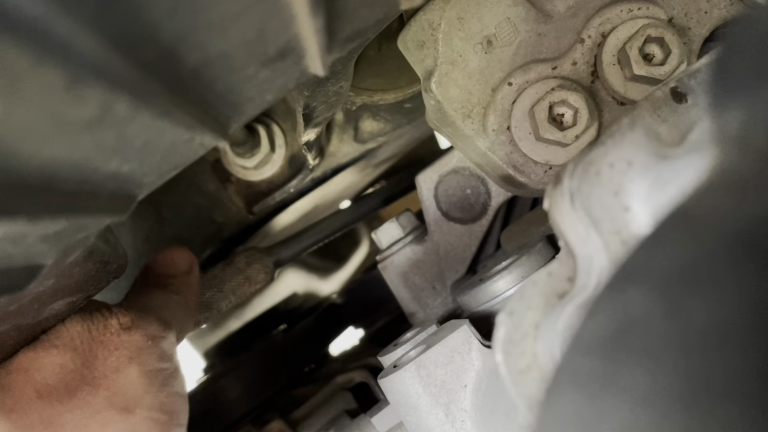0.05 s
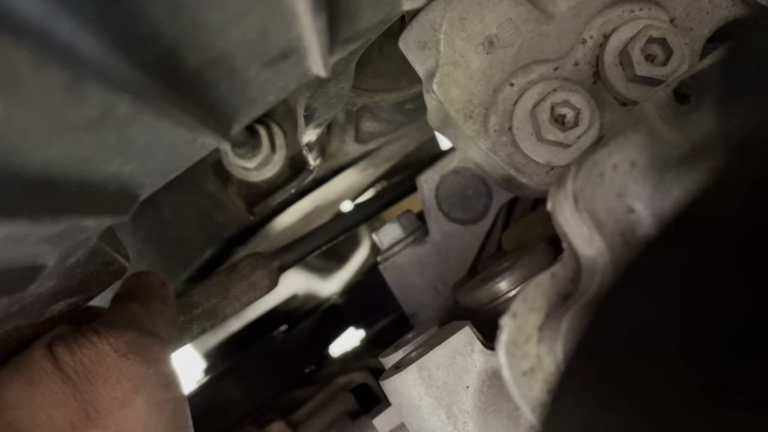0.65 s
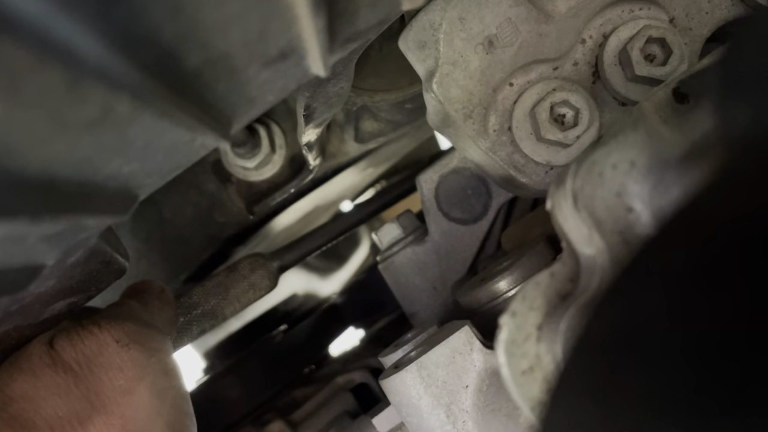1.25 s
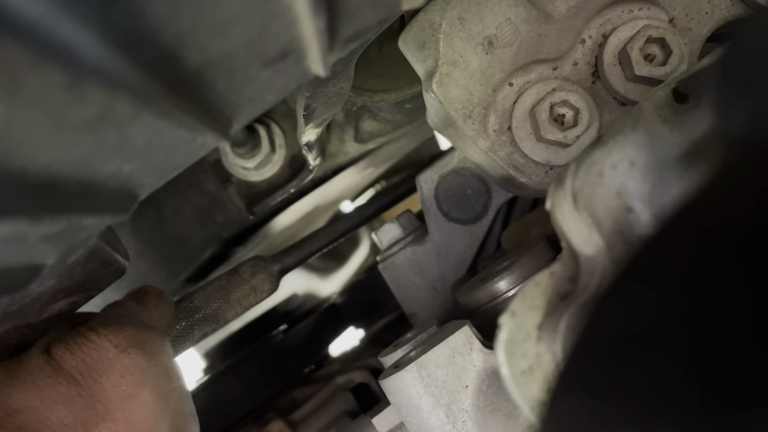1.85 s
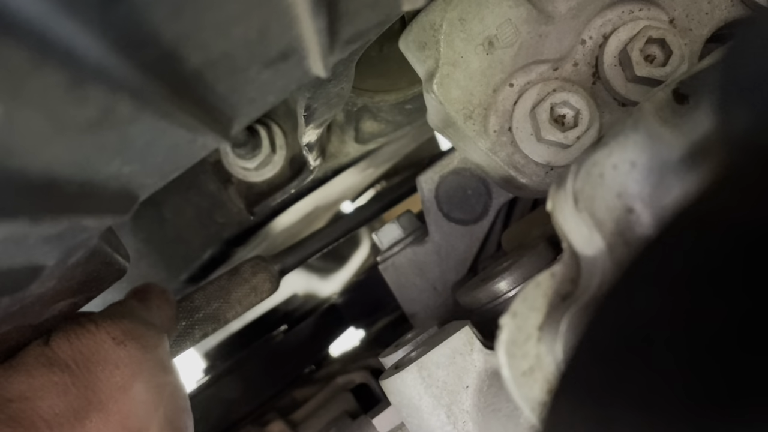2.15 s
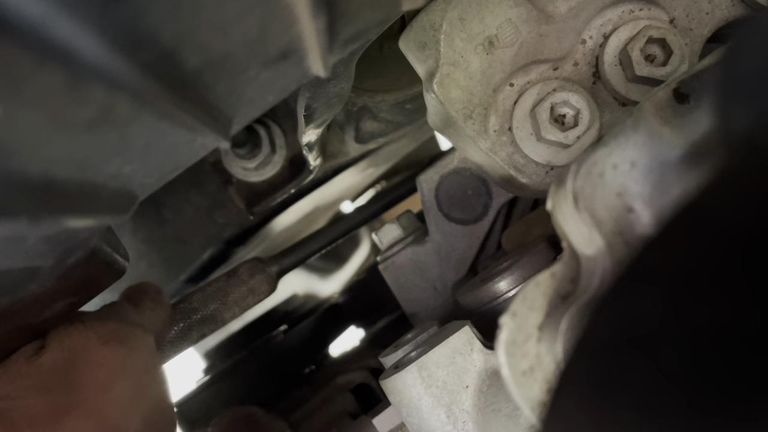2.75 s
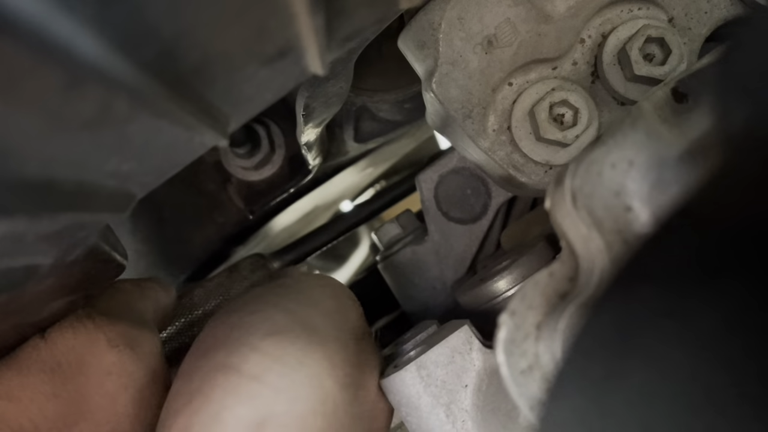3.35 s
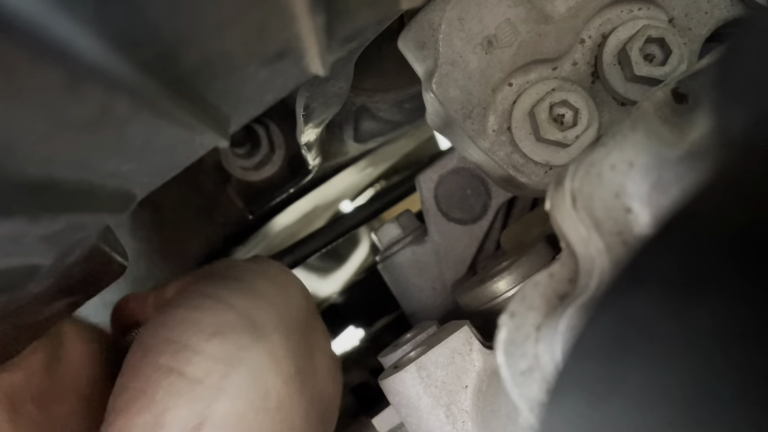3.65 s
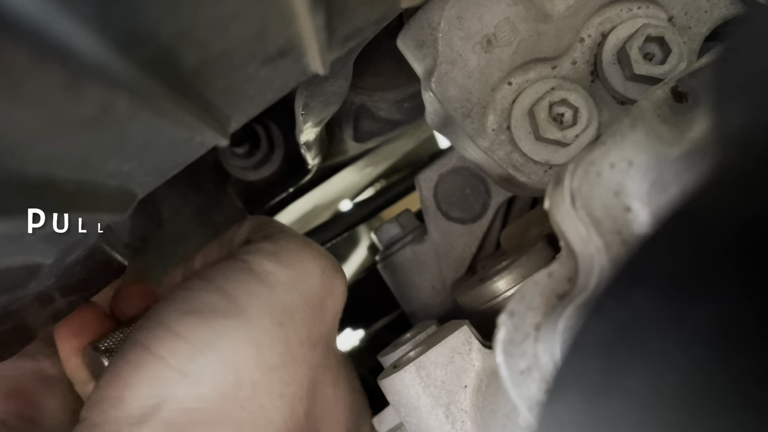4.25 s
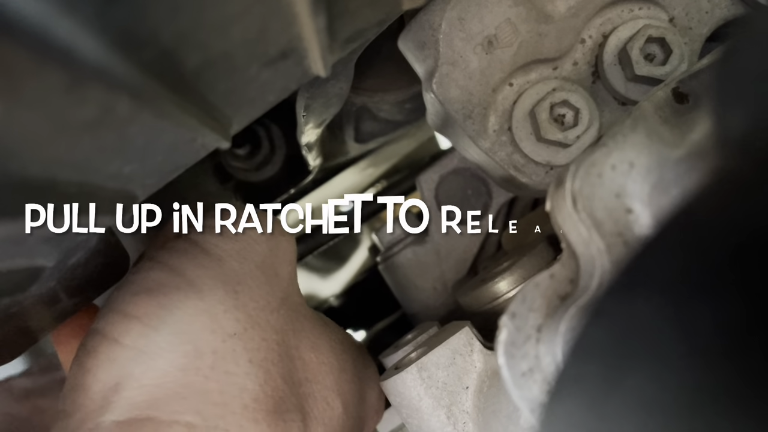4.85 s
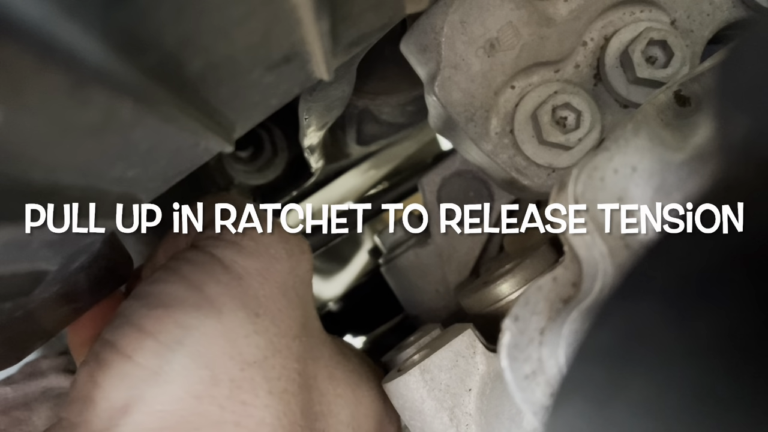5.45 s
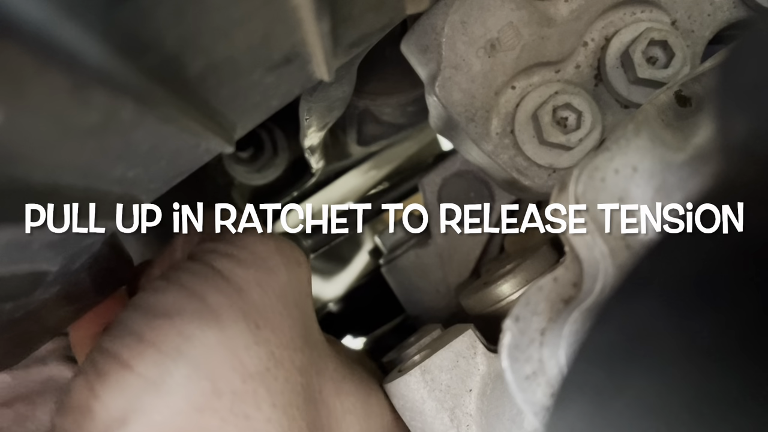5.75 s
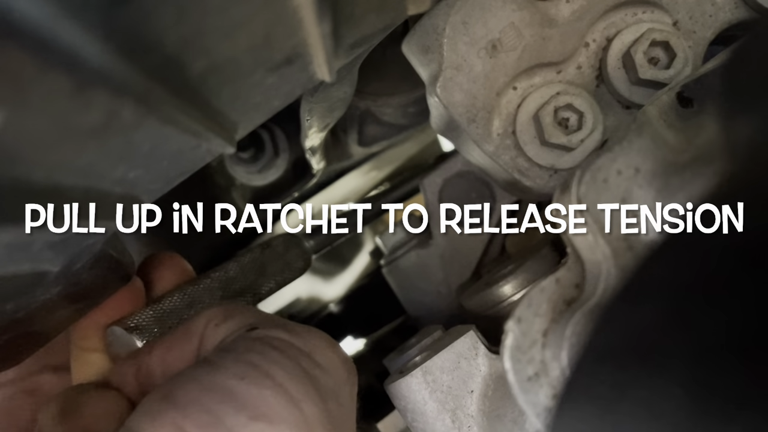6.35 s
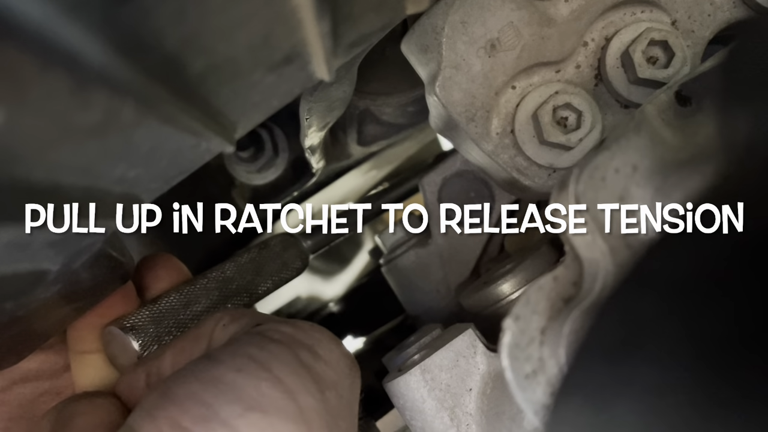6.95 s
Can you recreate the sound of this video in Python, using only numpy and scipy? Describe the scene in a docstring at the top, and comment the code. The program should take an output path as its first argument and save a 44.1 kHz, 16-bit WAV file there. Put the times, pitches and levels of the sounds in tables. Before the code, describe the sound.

Close, faint metal scraping and ticking as a ratchet is worked onto an engine part, with distant traffic rumbling outside.

```python
"""In a car's wheel well, a ratchet on a long extension is worked onto a belt tensioner, close by.
Hands hiss along the tool; steel scrapes, grazes and knocks against the engine, ringing the extension,
a housing and a bracket. The socket clicks home once, and later the tool gives one short squeak.
Traffic rumbles outside: one engine pulls past and changes gear, and another car's tyres draw near."""
import sys
import numpy as np
from scipy import signal
from scipy.fft import rfft, irfft
from scipy.io import wavfile
from scipy.ndimage import uniform_filter1d

SR = 44100
rng = np.random.default_rng(int(sys.argv[2]) if len(sys.argv) > 2 else 0)


def log_audio(samples):
    """Write samples as a 16-bit WAV file to the path given in sys.argv[1]."""
    # one column per channel
    frames = np.atleast_2d(samples).T
    # limit to full scale, then quantise
    limited = np.clip(frames, -1, 1)
    pcm = np.round(limited * 32767).astype(np.int16)
    wavfile.write(sys.argv[1], SR, pcm)


N = 308700
TIME, FREQS = np.arange(N) / SR, np.fft.rfftfreq(N, 1 / SR)

# ring of the socket and ratchet head: (frequency [Hz], level [dB], t60 [s])
SOCKET_MODES = [(1343, 2.5, 0.012), (1900, 4, 0.0066), (2220, -4, 0.016), (2840, -1.5, 0.01),
                (3370, -1.5, 0.014), (4360, 4, 0.007), (5500, -10.5, 0.014), (5850, -11, 0.0084),
                (7000, -24, 0.0083), (10460, -4, 0.006), (11300, -9.5, 0.0078), (13800, -1, .004)]
# ring of the steel extension: (frequency [Hz], width [Hz], level [dB])
EXTENSION_MODES = [(875, 45, 8), (1445, 46, -1), (2190, 23, 6), (3490, 59, -5), (3590, 15, 6.5),
                   (3850, 60, -3), (4630, 90, -5), (5520, 150, -8), (6430, 83, -7), (7700, 80, -5),
                   (8800, 330, -12)]
# stereo width of near and far sounds: (frequency [Hz], side against mid [dB])
NEAR_WIDTH = [(100, 4), (380, -12.5), (750, 4.5), (1300, -3.5), (2400, -3.5), (4400, -5), (6300, -4),
              (8000, -61.5), (16000, -24)]
FAR_WIDTH = [(60, -17.5), (120, -16), (200, -8.5), (380, -13), (520, -5.5), (720, 1.5), (1000, 4.5),
             (1400, -1.5), (2400, -2), (4400, -12), (9000, -96)]


def socket_clicks(chatter=0.05, spread_rad=0.46, pivot_hz=4000):
    """A hard contact and a brief chatter ring the socket; sharper contacts favour its high modes."""
    # metal on metal: (time [s], level [dB], chatter length [s], tilt [dB/octave])
    contacts = [(.7021, -10.8, .0001, 2), (.7030, -17, .0001, -1), (.7039, -24, .0002, -4),
                (1.77, -31, .0004, -5), (3.503, -32, .0006, -3), (.7055, -35, .0014, 2)]
    out, t = np.zeros((2, N)), np.arange(SR // 16) / SR
    hz, db, t60 = np.transpose(SOCKET_MODES)[:, :, None]
    # neighbouring modes swing in opposite senses and reach left and right slightly apart
    sense = (-1) ** np.arange(len(hz))[:, None]
    phase = spread_rad * np.array([1, -1])[:, None, None] * sense
    swing = sense * np.sin(2 * np.pi * hz * t + phase)
    for s, level_db, length, tilt_db in contacts:
        ring = (amp(db + tilt_db * np.log2(hz / pivot_hz) - 60 * t / t60) * swing).sum(1)
        age = t / length
        force = chatter * rng.standard_normal(len(t)) * age * np.exp(1 - age)
        force[0] += 1  # the first contact
        add(out, s, amp(level_db) * signal.fftconvolve(ring / abs(ring).max(), force[None], axes=1))
    return out


def socket_rubs():
    """Grinding round on the bolt head, the socket rings with the same modes as when it clicks."""
    # (centre time [s], length [s], level [dB])
    rubs = [(0.155, 0.028, -54), (0.465, 0.076, -48), (0.59, 0.07, -49), (1.045, 0.075, -50.5),
            (0.511, .028, -38), (2.542, .009, -40), (2.562, .04, -49.5)]
    modes = [(hz, np.log(1000) / (np.pi * t60), db) for hz, db, t60 in SOCKET_MODES]  # t60 to width
    return friction_ring(modes, swells(rubs))


def scrapes():
    """Scrapes along the steel grind, knock hollowly and ring; two faint, very short, dull ticks join."""
    # scrapes and ticks: (centre time [s], length [s], grind [dB], hollow knock [dB], ring [dB])
    events = [(0.51, 0.27, -51.5, -47.5, -73), (0.672, 0.027, -62, -44, -70),
              (0.716, 0.018, -51, -34.5, -65), (0.74, 0.035, -51, -39.5, -65),
              (0.894, 0.047, -47.5, -39, -63), (1.053, 0.19, -61, -49.5, -57.5),
              (1.369, 0.063, -47.5, -41.5, -54), (1.71, 0.073, -51.5, -54, -60),
              (1.787, 0.058, -49, -43.5, -66), (2.55, .06, -65, -54, -59), (3.507, 0.031, -50, -46, -51),
              (3.601, .041, -54, -63, -58), (3.933, 0.059, -44, -43.5, -52), (4.025, 0.04, -48, -43, -53.5),
              (4.085, 0.053, -42.5, -55, -52), (4.172, 0.034, -48.5, -50, -48),
              (4.233, 0.046, -41.5, -60, -46), (5.08, 0.0033, -58, -44, -75), (5.555, 0.011, -72, -49, -78),
              (5.731, 0.0032, -55, -35, -75), (5.933, 0.023, -51, -43.5, -67),
              (6.419, 0.017, -58, -41, -61)]
    # tone of the grind and of the hollow knock: (frequency [Hz], relative density [dB])
    grind_tone = [(300, 6.5), (800, 16), (1400, 6.5), (2200, 6.5), (3000, -3), (4500, -6), (7000, -4.5),
                  (12000, -10.5), (16000, -28)]
    knock_tone = [(80, -52), (220, -3.5), (320, 5.5), (420, -1.5), (570, 2), (800, -61), (1500, -41),
                  (5000, -67)]
    grind, knock, pressure = swells(events)
    grinding = grind * noise(at_hz(grind_tone), NEAR_WIDTH, asperities(per_s=1200, size_db=1.5))
    ringing = friction_ring(EXTENSION_MODES, pressure)
    return grinding + ringing + knock * noise(at_hz(knock_tone), NEAR_WIDTH)


def extension_clanks(falloff_db=32, contact_s=0.001):
    """A blunt knock on the engine wakes the extension's modes near one pitch, and they ring out."""
    # (time [s], level [dB], favoured pitch [Hz])
    knocks = [(4.214, -38, 880), (4.2245, -39.5, 2000), (4.2325, -39.5, 3500)]
    out, t = np.zeros((2, N)), np.arange(SR // 4) / SR
    hz, width, db = np.transpose(EXTENSION_MODES)[:, :, None]
    attack = 1 - np.exp(-t / contact_s)
    for s, level_db, favoured_hz in knocks:
        share = amp(db - falloff_db * np.log2(hz / favoured_hz) ** 2)
        phase = rng.uniform(0, 2 * np.pi, hz.shape) + np.array([.5, -.5])[:, None, None]
        modes = share / share.max() * np.exp(-np.pi * width * t) * np.sin(2 * np.pi * hz * t + phase)
        add(out, s, amp(level_db) * attack * modes.sum(1))
    return out


def bracket_bumps():
    """The tool judders against a steel bracket, which answers with a short, hollow knock."""
    # (centre time [s], length [s], level [dB])
    judders = [(0.881, 0.015, -41.5), (1.776, 0.0086, -41.5), (1.876, 0.049, -38.5), (3.508, 0.0076, -46)]
    # ring of the bracket: (frequency [Hz], width [Hz], level [dB])
    bracket_modes = [(490, 55, 11), (1116, 49, 0), (1312, 87, 1.5), (1445, 32, -11), (1660, 58, -3),
                     (1960, 22, -4), (2620, 32, -18), (3300, 67, -16)]
    return friction_ring(bracket_modes, swells(judders))


def edge_grazes():
    """A steel edge skids with a dry tick, too lightly to ring anything."""
    # (centre time [s], length [s], bite [dB], fizz [dB])
    skids = [(.7021, .001, -38, -29), (3.554, .004, -62, -41), (3.911, 0.012, -54, -40),
             (.707, .007, -42, -43), (.78, .003, -66, -53), (1.378, .008, -56, -51),
             (1.772, .006, -57, -53), (1.788, .008, -49, -48.5), (2.15, 0.034, -62.5, -54),
             (2.346, 0.01, -60, -47.5), (3.505, 0.0072, -52.5, -50), (4.068, .018, -54, -53),
             (4.17, 0.029, -51, -56), (4.226, 0.018, -51, -46), (4.309, .01, -65, -63),
             (4.416, .022, -57, -56), (4.69, 0.016, -61.5, -62), (4.845, .01, -59, -66),
             (5.6, 0.014, -66, -67), (5.925, 0.012, -52, -54), (5.937, .016, -54.5, -50),
             (6.386, 0.048, -65, -61), (6.412, 0.0082, -48.5, -57), (6.569, .004, -60, -62),
             (6.834, 0.014, -55, -63)]
    # the two colours of a graze: (frequency [Hz], relative density [dB])
    bite_tone = [(1000, -14), (2600, -18), (3900, 2.5), (4900, -6), (6000, -3.5), (8000, -9), (16000, -19)]
    fizz_tone = [(4000, -30), (7000, -7), (8500, 4), (9700, -0.5), (11200, -1), (12500, -4), (14000, -2),
                 (16000, -9.5)]
    bite, fizz = swells(skids)
    grit = asperities(per_s=910, size_db=-1.5)
    return (bite * noise(at_hz(bite_tone), NEAR_WIDTH, grit)
            + fizz * noise(at_hz(fizz_tone), NEAR_WIDTH, grit))


def tool_squeak(start_s=4.9335, length_s=0.02, pitch_hz=1365, level_db=-32, rise=0.19):
    """The tool sticks and slips for an instant on one note."""
    out, t = np.zeros((2, N)), np.arange(0, length_s, 1 / SR)
    age = t / (rise * length_s)
    envelope = age * np.exp(1 - age) * signal.windows.tukey(len(t), .25)
    note = np.sin(2 * np.pi * pitch_hz * t + np.array([[.6], [-.6]]))
    add(out, start_s, amp(level_db) * envelope * note)
    return out


def hand_slides(gain_db=5, ring=0.26, unsteady_db=0.94, patchy_db=3.5, grip_db=2):
    """Skin and knurled steel hiss as they slide; a light touch is brighter than a firm one."""
    # skin on steel: (frequency [Hz], relative density [dB])
    skin_tone = [(200, 2.5), (600, -8.5), (1300, 0.5), (2000, 3), (2900, 0), (4300, 0), (5200, -0.5),
                 (6300, -2), (8000, 2), (11300, 0.5), (13500, -3.5), (16000, -1)]
    tone_db = at_hz(skin_tone) + ring * ring_db(EXTENSION_MODES)
    hiss = noise(tone_db, NEAR_WIDTH, asperities(per_s=230, size_db=1.5))
    hz, t, frames = signal.stft(hiss, SR, nperseg=512)
    gain, bright_db, grip_hz = hand_strokes(t)
    tilt = at_hz([(1200, -1.44), (3600, -0.38), (11000, 0.42), (13500, 0.76)], hz)
    # the grip moves one broad peak; random narrow peaks flicker through the hiss
    grip_peak = np.exp(-(np.log2((hz[:, None] + 1) / grip_hz) / .18) ** 2)
    patches = uniform_filter1d(rng.standard_normal(frames.shape[1:]), size=2, axis=0)
    patches = uniform_filter1d(patches, size=10, axis=1)
    colour_db = tilt[:, None] * bright_db + grip_db * grip_peak + patchy_db * patches / patches.std()
    hiss = signal.istft(frames * gain * amp(colour_db), SR, nperseg=512)[1][:, :N]
    return hiss * amp(gain_db + unsteady_db * wander(24))


def hand_strokes(t, rise_db_per_s=186, fall_db_per_s=250):
    """Gain, brightness and grip resonance at the times t; the strongest stroke sets the colour."""
    # (start [s], length [s], level [dB], brightness [dB], grip resonance [Hz])
    strokes = [(0.027, 0.35, -59.5, -5, 4470), (0.348, 0.27, -54, -5.5, 4700), (0.467, 0.18, -55, -8, 4500),
               (0.733, 0.024, -60.5, -7.5, 4420), (.87, 0.055, -64.5, -4, 4360),
               (1.005, 0.074, -52.5, -5.5, 4300), (1.126, 0.057, -73, -2, 4400),
               (1.318, 0.054, -53, -2.5, 4700), (1.519, 0.28, -64.5, -4, 4647),
               (1.684, 0.027, -57, -1, 4580), (1.872, 0.15, -57.5, -3.5, 4800),
               (2.093, 0.086, -70.5, -3, 4850), (2.213, 0.3, -71.5, -12.5, 4720),
               (2.478, 0.23, -54.5, -1.5, 6140), (2.755, 0.1, -53, 2, 6000), (2.909, 0.11, -57, 2, 5700),
               (3.144, 0.064, -57.5, 4, 5100), (3.426, 0.14, -67, 4, 4000), (3.576, 0.088, -55.5, 3, 3740),
               (3.72, 0.19, -62, 4.5, 4500), (3.893, 0.061, -54, -1.5, 5060),
               (4.08, 0.16, -62.5, -4.5, 3800), (4.418, 0.14, -62.5, -5, 3560),
               (4.697, 0.041, -67, -4, 3740), (4.83, 0.16, -70, -8, 3750), (5.1, 0.18, -76, -9, 3950),
               (5.38, 0.1, -71, -4, 3900), (5.847, 0.23, -65.5, -2, 4000), (6.112, 0.059, -53, 7, 5870),
               (6.248, 0.052, -63, 2, 6000), (6.592, 0.12, -71.5, -5, 5960), (6.81, 0.042, -70.5, -8, 5900)]
    rest_db, rest_bright_db, rest_hz = -78.5, -14.5, 4680  # the hand resting on the tool
    start, length, level_db, bright_db, grip_hz = np.transpose(strokes)[:, :, None]
    fade_in_db = rise_db_per_s * np.maximum(start - t, 0)
    fade_out_db = fall_db_per_s * np.maximum(t - start - length, 0)
    power, rest = amp(level_db - fade_in_db - fade_out_db) ** 2, amp(rest_db) ** 2
    total = power.sum(0) + rest
    brightness = ((power * bright_db).sum(0) + rest * rest_bright_db) / total
    resonance = ((power * grip_hz).sum(0) + rest * rest_hz) / total
    return np.sqrt(total), brightness, resonance


def fingertip_creeps(centre_hz=11300, width_hz=1100):
    """Fingertips creep over the knurled handle with a thin, high hiss."""
    # (centre time [s], length [s], level [dB])
    creeps = [(4.804, .2, -77), (4.98, 0.21, -77), (5.42, .15, -86), (6.638, 0.16, -68.5)]
    band_db = -20 * np.log10(1 + (2 * (FREQS - centre_hz) / width_hz) ** 2)
    return swells(creeps) * noise(band_db, NEAR_WIDTH, asperities(per_s=330, size_db=5.0))


def wheel_well(x, t60_s=0.08, wet_db=-17):
    """Close metal and plastic panels throw back a short, dense tail."""
    t = np.arange(SR // 4) / SR
    echoes = rng.standard_normal((2, len(t))) * (rng.random((2, len(t))) < 1 / 16)
    echoes *= amp(-60 * t / t60_s) * (t > .002)  # decay and pre-delay
    tail = signal.fftconvolve(x, echoes / np.linalg.norm(echoes[0]), axes=1)[:, :N]
    return x + amp(wet_db) * tail


def passing_engine(waver=0.0041, flutter_db=1.7, away_db=-10, facing_boost_db=17):
    """Only the low orders of a distant exhaust and driveline arrive; pitch drops at the gear change."""
    # the drive past: (time [s], speed [turns/s], exhaust level [dB])
    drive = [(0, 19.8, -39.5), (.4, 18, -41), (.95, 19, -57), (1.18, 18.1, -38), (1.6, 20.5, -48),
             (1.95, 17.1, -37.5), (2.42, 17.9, -32.5), (2.8, 18.6, -34.5), (2.98, 18.8, -39.5),
             (3.18, 17.6, -38), (3.4, 17, -77), (5, 25, -75)]
    # engine orders: (multiple of the turning speed, level [dB])
    orders = [(3.1, 1.5), (5, -3), (6, -13), (10, -14), (13, -23)]
    speed, level_db = at_time(drive)
    turns = np.cumsum(speed * (1 + waver * wander(7.4))) / SR
    # the upper orders come through while the tailpipe faces the opening
    upper_db = away_db + facing_boost_db * swell(s=3, length=0.77)
    note = np.zeros(N)
    for row, (multiple, db) in enumerate(orders):
        gain = amp(db + upper_db * (row > 0) + flutter_db * wander(7.3))
        note += gain * np.sin(2 * np.pi * (multiple * turns + rng.random()))
    return amp(level_db) * np.sqrt(2) * note


def background_bands():
    """Narrow bands of low hum and hiss swell and fade in the background."""
    # (centre time [s], length [s], frequency [Hz], width [Hz], level [dB])
    swelling_bands = [(2.346, 0.29, 175.3, 22, -37.5), (2.693, 1.2, 1004, 60, -62.5),
                      (3.194, 1.8, 390, 53.4, -47), (3.404, 0.89, 174, 37.5, -46),
                      (4.506, 2.5, 247.7, 47, -47), (6.495, 0.27, 169, 59.6, -45),
                      (6.802, 0.78, 711, 36, -57), (6.9, 1, 1410, 73, -56)]
    out = np.zeros((2, N))
    for s, length, hz, width, db in swelling_bands:
        band_db = -20 * np.log10(1 + (2 * (FREQS - hz) / width) ** 4)
        out += amp(db) * swell(s, length) * noise(band_db, FAR_WIDTH)
    return out


def traffic(road_db=-49, drift_db=0.16, drift_hz=3.8, hiss_falloff=1.33):
    """Over a deep rumble, road roar and tyre hiss rise as cars near, coloured by the wheel well."""
    # tone of each layer: (frequency [Hz], relative density [dB])
    rumble_tone = [(20, -42), (33, -30), (45, -10), (60, -1.5), (80, -2), (100, 0), (130, -11.5),
                   (170, -11), (230, -25), (400, -22), (900, -94)]
    roar_tone = [(25, -18), (70, -5), (150, 1.5), (240, -1), (315, -5.5), (440, -7.5), (600, -12.5),
                 (800, -19), (950, -24.5), (1400, -28), (2800, -48), (6000, -54.5), (16000, -53)]
    tyre_tone = [(300, -19), (580, 1.5), (700, 5), (800, 0.5), (1100, -2), (1400, -4), (1540, -6.5),
                 (1750, -4), (2000, -9), (3000, -20.5), (5000, -34), (16000, -68)]
    # air resonances of the wheel well: (frequency [Hz], width [Hz], level [dB])
    cavity_modes = [(157, 90, 0), (384, 16, -1.5), (480.6, 26, 4.5), (713, 31, 1), (1003, 23, -3.5),
                    (1314, 60, -2), (1740, 45, -8)]
    # cars going by: (time when nearest [s], time to half roar power [s], roar [dB], tyre hiss [dB])
    passes = [(1.5, 1.38, -67, -54), (3.15, 1.92, -40.5, -83), (7.05, 0.6, -43, -46)]
    # rise and fall of the rumble: (time [s], level [dB])
    rumble_curve = [(0, -38), (.9, -40), (1.5, -38), (3, -36), (4.5, -38.5), (5.0, -40), (5.6, -41.5),
                    (6.05, -38.5), (7, -38.5)]
    cavity_db = ring_db(cavity_modes)
    s, half_s, roar_db, tyre_db = np.transpose(passes)[:, :, None]
    nearness = 1 / (1 + ((TIME - s) / half_s) ** 2)
    roar_gain = np.sqrt(amp(road_db) ** 2 + (amp(roar_db) ** 2 * nearness).sum(0))
    tyre_gain = np.sqrt((amp(tyre_db) ** 2 * nearness ** hiss_falloff).sum(0))  # hiss fades faster
    rumble_gain = amp(at_time(rumble_curve)[0] + drift_db * wander(drift_hz))
    rumble = rumble_gain * noise(at_hz(rumble_tone), FAR_WIDTH)
    roar = roar_gain * noise(at_hz(roar_tone) + cavity_db, FAR_WIDTH)
    tyres = tyre_gain * noise(at_hz(tyre_tone) + cavity_db, FAR_WIDTH)
    return pan(rumble, .5) + pan(roar + tyres, -.3)


def friction_ring(modes, pressure):
    """Gritty friction under a changing pressure sets a steel part ringing."""
    steel = resonances(modes)
    friction = pressure * noise(0, NEAR_WIDTH, asperities(per_s=540, size_db=2.5))
    return irfft(rfft(friction) * steel / np.sqrt(np.mean(abs(steel) ** 2)), N)


def asperities(per_s, size_db):
    """Tiny catches of random size on top of smooth sliding."""
    catches = (rng.random(N) < per_s / SR) * amp(size_db * np.minimum(rng.exponential(1, N), 4))
    return 1 + signal.lfilter([1], [1, -np.exp(-1 / 8)], catches)


def resonances(modes):
    """The complex gain of a set of damped resonances."""
    return sum(amp(db) / (1 + 2j * (FREQS - hz) / width) for hz, width, db in modes)


def ring_db(modes):
    """The peaks that resonances raise on a smooth spectrum."""
    return 10 * np.log10(1 + sum(abs(resonances([mode])) ** 2 for mode in modes))


def noise(colour_db, width, grit=1):
    """Coloured stereo noise; grit gathers it into grains before it is coloured."""
    mid, side = rfft(rng.standard_normal((2, N)) * grit) * amp(colour_db)
    side = side * amp(at_hz(width))
    return unit(irfft(np.array([mid + side, mid - side]), N))


def wander(rate_hz):
    """A slow random drift of rms 1."""
    return unit(irfft(rfft(rng.standard_normal(N)) * np.exp(-(FREQS / rate_hz) ** 2), N))


def swell(s, length):
    """A smooth rise and fall around the moment s."""
    out, near = np.zeros(N), slice(*np.searchsorted(TIME, [s - 2 * length, s + 2 * length]))
    out[near] = np.exp(-(2 * (TIME[near] - s) / length) ** 2)
    return out


def swells(events):
    """One envelope for each level column, with a swell at every event."""
    return sum(amp(levels)[:, None] * swell(s, length) for s, length, *levels in events)


def amp(db):
    """Decibels to gain."""
    return 10 ** (np.asarray(db) / 20)


def pan(x, right_db):
    """Raises the right channel and lowers the left by the same amount."""
    return x * amp([[-right_db], [right_db]])


def unit(x):
    """Scales a sound so that its mid channel has rms 1."""
    return x / np.sqrt(np.mean(np.atleast_2d(x).mean(0) ** 2) + 1e-20)


def at_hz(points, hz=FREQS):
    """Reads a table on a log-frequency axis."""
    f, value = np.transpose(points)
    return np.interp(np.log(hz + 1), np.log(f + 1), value)


def at_time(rows):
    """Reads every column of a curve at each sample."""
    s, *columns = np.transpose(rows)
    return [np.interp(TIME, s, column) for column in columns]


def add(mix, s, sound):
    """Mixes a sound in at s seconds."""
    part = mix[:, max(round(s * SR), 0):][:, :sound.shape[-1]]
    part += sound[..., :part.shape[-1]]


def scene():
    """Traffic outside; close by, dry hands and steel that echoes in the wheel well."""
    outside = traffic() + background_bands() + pan(passing_engine(), .5)
    hands = hand_slides() + fingertip_creeps()
    steel = (scrapes() + socket_rubs() + bracket_bumps() + edge_grazes()
             + socket_clicks() + extension_clanks() + tool_squeak())
    return outside + pan(hands + wheel_well(steel), -.3)


def record(dry, cutoff_hz=15900):
    """Left and right drift in and out of step across the treble; a low-pass trims the top."""
    # phase between left and right: (frequency [Hz], left lead [rad])
    treble_phase = [(0, 0), (6000, 0), (6800, -1), (7700, -2.8), (8700, -3.5), (11100, -6.1), (12300, -6.6),
                    (14200, -9.1), (16000, -9.7)]
    turn = np.exp(.5j * np.interp(FREQS, *np.transpose(treble_phase)))
    turned = irfft(rfft(dry) * np.array([turn, turn.conj()]), N)
    low_pass = signal.firwin(511, cutoff_hz, window=("kaiser", 9), fs=SR)
    return signal.oaconvolve(turned, low_pass[None], "same")


dry = scene()
out = record(dry)
log_audio(out)
```